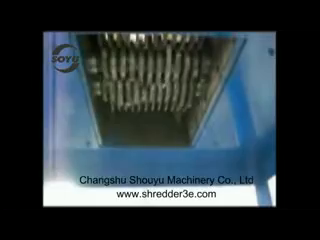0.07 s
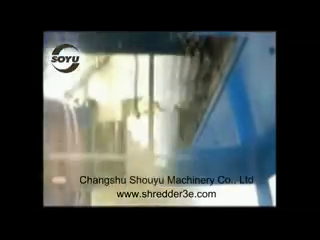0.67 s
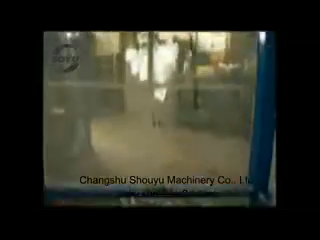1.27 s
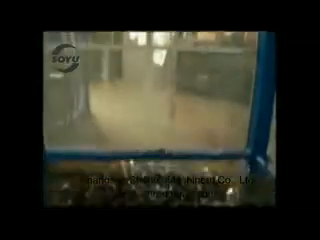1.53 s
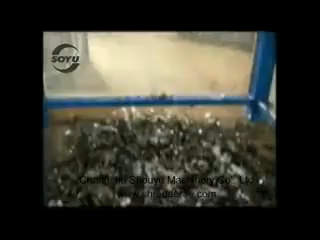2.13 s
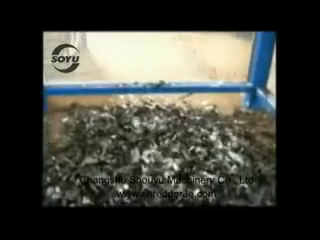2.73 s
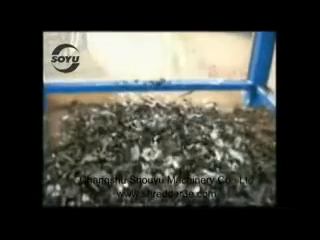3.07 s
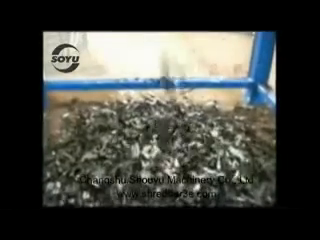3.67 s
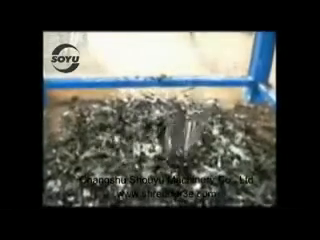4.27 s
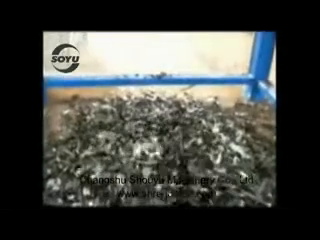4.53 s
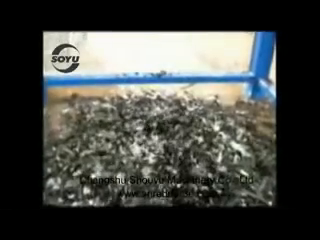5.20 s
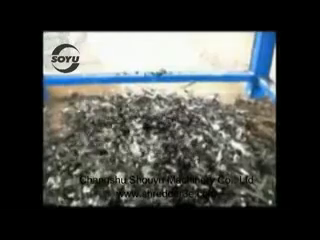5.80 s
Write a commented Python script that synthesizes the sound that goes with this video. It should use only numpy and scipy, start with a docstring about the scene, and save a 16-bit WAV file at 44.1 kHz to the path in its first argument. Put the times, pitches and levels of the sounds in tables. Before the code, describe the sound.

Steel crunches and tears in a running shredder while the fragments rattle steadily onto a heap of scrap in a bin. The noise swells in uneven flurries, dotted with cracks and brief, damped rings from larger plates. Underneath, the motor hums and the gears rumble softly, and a faint drumming from the bin joins later. It is heard from close by with a little workshop reverberation and a lo-fi, fizzy treble.

```python
"""In a workshop, a twin-shaft shredder chews sheet metal. Its motor hums over rumbling gears, and
the slips of tearing steel excite the resonances of the housing. Scrap snaps between the blades;
torn pieces clatter down the chute onto a pile and drum on the bin. Now and then a plate clangs
in damped free vibration. A small camera close by rounds off the peaks, and its low sampling rate
adds a mirror image of the spectrum in the treble."""
import sys
import numpy as np
from scipy import signal
from scipy.fft import rfft, irfft, next_fast_len
from scipy.io import wavfile
from scipy.ndimage import map_coordinates

SR = 44100
rng = np.random.default_rng(int(sys.argv[2]) if len(sys.argv) > 2 else 0)


def output_pcm(signal):
    """Save a mono or channel-first signal as 16-bit PCM at the path in sys.argv[1].

    Samples are clipped to [-1, 1] before scaling.
    """
    pcm = np.clip(np.atleast_2d(signal).T, -1, 1) * 32767
    wavfile.write(sys.argv[1], SR, np.round(pcm).astype(np.int16))


N = 265482


def amp(db):
    return 10 ** (np.asarray(db) / 20)


def unit(x):
    return x / np.sqrt(np.mean(x ** 2) + 1e-20)


def along(points, hz):
    """Interpolation of (frequency, value) points on a logarithmic frequency axis."""
    freqs, values = np.transpose(points)
    return np.interp(np.log(hz + 1), np.log(freqs + 1), values)


def curves(rows):
    """Linear interpolation in time: one value per sample for each column after the first."""
    times, *columns = np.transpose(rows)
    return [np.interp(np.arange(N) / SR, times, column) for column in columns]


def wobble(rate):
    """Smooth random modulation: a spline through rate knots a second."""
    return map_coordinates(rng.standard_normal(int(N * rate / SR) + 4), [np.arange(N) * rate / SR])


def add(track, start_s, sound):
    """Superposition of a sound on a track."""
    part = track[max(round(start_s * SR), 0):][:len(sound)]
    part += sound[:len(part)]


def filtered(x, gain):
    """Zero-phase filtering: the spectrum is multiplied by a gain over frequency."""
    size = next_fast_len(N + SR // 2)
    return irfft(rfft(x, size) * gain(np.fft.rfftfreq(size, 1 / SR)), size)[:N]


def resonances(modes, hz):
    """Summed gain of Lorentzian resonance peaks."""
    return sum(amp(db) / (1 + (2 * (hz - centre) / width) ** 2) for centre, width, db in modes)


def body(gain, size=8192):
    """Minimum-phase impulse response, of energy 1, with the spectral shape of gain."""
    magnitude = np.maximum(gain(np.fft.rfftfreq(size, 1 / SR)), 1e-6)
    cepstrum = irfft(np.log(magnitude))
    cepstrum[1:size // 2] *= 2
    cepstrum[size // 2 + 1:] = 0
    response = irfft(np.exp(rfft(cepstrum)))
    return response / np.linalg.norm(response)


def contacts(length, rate, spread_db):
    """Poisson process: about rate impulses a second, of random sign and size; rms 1."""
    hit = rng.random(length) < rate / SR
    hit[0] = True
    sign = rng.choice([-1, 1], length)
    return unit(hit * sign * amp(spread_db * np.clip(rng.standard_normal(length), -2, 2)))


def piece(pitch_hz, t60, ring, count=14):
    """Impact on a bent piece: a click and damped modes, with a formant at pitch_hz; energy 1."""
    t = np.arange(SR // 10) / SR
    mode_hz = rng.uniform(699.2, 5000, (count, 1))
    mode_t60 = t60 * np.exp(.5 * rng.standard_normal((count, 1)))
    weights = rng.standard_normal((count, 1))
    modes = np.sum(weights * np.sin(2 * np.pi * mode_hz * t) * amp(-60 * t / mode_t60), axis=0)
    formant = body(lambda hz: 0.62 + resonances([(pitch_hz, .55 * pitch_hz, 0)], hz), size=256)
    knock = np.convolve((t == 0) + ring * modes / np.linalg.norm(modes), formant)
    return knock / np.linalg.norm(knock)


def through_scrap(x):
    """Radiation from thin torn steel favours the upper middle range."""
    # spectral shape of the scrap: frequency_hz, gain_db
    radiation = [(150, -18.5), (500, -22), (1000, -7.5), (1400, -6), (1800, -6.5), (2100, -4.5),
                 (2380, -2.5), (2900, -4.5), (3500, -5.5), (4100, -5.5), (5200, 2), (7000, -38)]
    return signal.fftconvolve(x, body(lambda hz: amp(along(radiation, hz))))[:N]


def clatter(level_db, count=48):
    """Impacts on chute and pile superpose in flurries; small, high pieces strike most often."""
    flurry = amp(1.1 * wobble(70))
    knocks = np.zeros(N)
    for hz in np.linspace(1100, 4400, count):
        strikes = flurry * contacts(N, rate=hz / 110, spread_db=3.0)
        knocks += signal.oaconvolve(strikes, piece(hz, t60=0.058, ring=0.77))[:N] / np.sqrt(hz)
    return amp(level_db) * unit(through_scrap(knocks))


def through_housing(x):
    """Structure-borne sound: blows on the cutters reach the air through frame and resonant panels."""
    # spectral shape of blows on the cutters: frequency_hz, gain_db
    cutters = [(60, -23.5), (150, -9.5), (200, -4.5), (270, -1), (340, -3), (400, -1.5), (540, -3.5),
               (720, -1.5), (1000, -3), (1600, -3), (4000, -20.5)]
    # steel panel modes: centre_hz, width_hz, relative_db
    panels = [(290, 44, -15), (372, 15, -9), (624, 210, 2), (760, 56, 1), (1010, 110, -1.5)]
    response = body(lambda hz: amp(along(cutters, hz)) * (1 + 0.51 * resonances(panels, hz)))
    return signal.fftconvolve(x, response)[:N]


def crunch(level_db):
    """Shot noise: the blades tear the sheet in countless small slips."""
    return amp(level_db) * unit(through_housing(contacts(N, rate=1800, spread_db=0.5)))


def bin_boom():
    """Impact excitation: scrap landing on the pile drums on the resonant walls of the bin."""
    # wall modes: centre_hz, width_hz, relative_db
    walls = [(211.4, 48, -4), (236.8, 47, -2.5)]
    # the boom grows as the camera comes down to the bin: time_s, level_db
    boom_levels = [(0, -55), (1.5, -57), (2.0, -43.5), (3.2, -45), (4.5, -38), (6, -37.5)]
    landings = contacts(N, rate=130, spread_db=8.5)
    boom = signal.fftconvolve(landings, body(lambda hz: resonances(walls, hz)))[:N]
    return amp(curves(boom_levels)[0]) * unit(boom)


def drive(load_db):
    """Modulation: the motor's two harmonics waver, and the gears' lumpy rumble follows the load."""
    # motor hum: time_s, level_db
    hum_levels = [(0, -47), (0.6, -58), (1.0, -49), (2.6, -47), (2.97, -63), (4.2, -56.5), (4.5, -43),
                  (5.4, -60), (5.85, -43)]
    hum_db, = curves(hum_levels)
    motor_hz = 114.7
    phase = 2 * np.pi * np.cumsum(motor_hz * (1 + 0.01424 * wobble(7))) / SR
    hum = unit(amp(1.8 * wobble(6.1)) * (np.sin(phase) + 0.21 * np.sin(2 * phase)))
    # spectral shape of the gear rumble: frequency_hz, gain_db
    gears = [(10, -9.5), (25, 1), (55, 0.5), (90, 3), (150, -2.5), (300, -10.5), (1000, -51)]
    lumps = amp(4.1 * wobble(9.8))
    rumble = unit(lumps * filtered(rng.standard_normal(N), lambda hz: amp(along(gears, hz))))
    rumble_db = -45.5 + 0.49 * (load_db - load_db.mean())
    return amp(hum_db) * hum + amp(rumble_db) * rumble


def crashes():
    """Impulsive excitation: a piece cracks or crumples, rattles briefly and shakes the housing."""
    # breaking scrap: start_s, strength_db, thud_offset_db, pitch_hz, rattle_s
    breaks = [(0.093, -13, -20, 2770, .007), (0.142, -11.5, -18, 2540, 0.023),
              (0.175, -3.5, -20, 1300, 0.0097), (0.224, -14, -26, 2650, .022),
              (0.412, -10.5, -10.5, 3100, 0.0089), (0.512, -10, -40, 2820, 0.0037),
              (0.61, -11, -22, 1330, 0.0061), (0.725, -11, -34, 2600, 0.0088),
              (0.772, -15, -12, 2530, 0.048), (1.099, -17.5, -22, 3300, .022),
              (1.528, -14.5, -29, 3560, 0.024), (1.581, -8, -7.5, 1850, 0.0062),
              (1.676, -13, -22, 2520, 0.0062), (1.779, -10.5, -18, 3200, 0.0078),
              (1.863, -18.5, -10, 2790, 0.011), (2.087, -10, -9, 2500, 0.037),
              (2.256, -10, -15, 4140, 0.01), (2.456, -8, -10, 2240, 0.03), (2.547, -15.5, -2, 990, 0.013),
              (2.722, -9, -13, 2750, 0.014), (3.131, -3.5, -13, 1290, 0.011),
              (3.196, -7.5, -15, 2110, 0.0073), (3.679, -13, -32, 3740, 0.02),
              (4.025, -8.5, -28, 2350, 0.0092), (4.163, -14, -29, 1980, 0.0043),
              (4.584, -11, -13, 1250, .007), (4.763, -10.5, -8, 1980, 0.035),
              (4.898, -9.5, -6.5, 2490, 0.024), (4.952, -8.5, -16, 2560, 0.015),
              (4.983, -11.5, -5.5, 2230, 0.017), (5.039, -9, -7.5, 2250, 0.007),
              (5.095, -10.5, -25, 2060, 0.0077), (5.14, -5.5, -30, 2330, 0.0062),
              (5.264, -4, -27, 2600, .014), (5.321, -9, -11, 2520, 0.0096), (5.425, -5, -12, 1600, 0.011),
              (5.46, -6.5, -10, 3100, 0.021), (5.521, -7.5, -34, 2560, .01), (5.595, -9, -12, 2250, 0.0071),
              (5.648, -8, -17, 2600, 0.017)]
    snap = 1.57  # lifts the first contacts above the rattle
    t = np.arange(SR // 5) / SR
    cracks, thuds = np.zeros(N), np.zeros(N)
    for start_s, db, thud_offset_db, pitch_hz, rattle_s in breaks:
        onset = 1 + (snap - 1) * np.exp(-t / 0.0028)
        envelope = onset * amp(-60 * np.maximum(t - rattle_s, 0) / 0.13)
        burst = envelope * contacts(len(t), rate=6000, spread_db=2.0)
        burst[0] = 4.2 * snap
        crack = signal.fftconvolve(burst, piece(pitch_hz, t60=.025, ring=0.23))
        thud = envelope * contacts(len(t), rate=1900, spread_db=-2.0)
        add(cracks, start_s, amp(db - 11.0) * crack)
        add(thuds, start_s, amp(db + thud_offset_db - 7.0) * thud)
    return through_scrap(cracks) + through_housing(thuds)


def shredding_levels():
    """Incoherent sources add in power: steady flow plus bites give clatter and crunch levels in dB."""
    # steady flow of scrap: time_s, clatter_db, crunch_db
    flow = [(0, -28.5, -31.5), (0.39, -31, -37.5), (0.48, -26.5, -29.5), (0.93, -25, -34.5),
            (1.1, -28, -35), (1.5, -29.5, -35), (1.9, -29.5, -33.5), (2.38, -33, -32.5), (2.55, -25.5, -31),
            (3.12, -24.5, -32), (3.28, -19.5, -30), (3.67, -27.5, -31), (4.05, -23, -32),
            (4.3, -27.5, -35.5), (4.72, -30.5, -28.5), (5.0, -22, -29), (5.58, -19, -26),
            (6.02, -26.5, -29.5)]
    # the cutters bite and chips spill down: start_s, length_s, clatter_db, crunch_db
    bites = [(0.205, 0.11, -19, -31), (0.4, 0.024, -15.5, -35.5), (0.756, 0.14, -25.5, -27.5),
             (0.989, 0.014, -24, -30), (1.147, 0.025, -20.5, -27), (1.254, 0.031, -20, -34),
             (1.693, 0.072, -21.5, -40.5), (2.41, 0.023, -21.5, -34), (2.474, 0.15, -23, -22.5),
             (2.663, 0.086, -18, -21), (3.02, 0.06, -21, -26), (3.173, 0.026, -14.5, -25),
             (3.328, 0.046, -20.5, -27), (3.401, 0.026, -14, -21.5), (3.565, 0.048, -19, -27.5),
             (3.714, 0.15, -18.5, -32), (3.897, 0.022, -12, -21), (4.233, 0.031, -19.5, -29.5),
             (4.37, 0.046, -22, -32), (4.537, 0.045, -33, -25), (5.161, 0.063, -16.5, -31.5),
             (5.352, 0.17, -18, -30), (5.662, 0.15, -17, -24), (5.882, 0.065, -23, -23.5)]
    attack_s, release_t60_s = 0.018, 0.18
    t = np.arange(N) / SR
    power = amp(curves(flow)) ** 2
    for start_s, length_s, clatter_db, crunch_db in bites:
        rise = np.clip((t - start_s) / attack_s, 0, 1)
        fall = amp(-60 * np.maximum(t - start_s - length_s, 0) / release_t60_s)
        power += (amp([[clatter_db], [crunch_db]]) * rise * fall) ** 2
    return 10 * np.log10(power)


def clangs():
    """Damped free vibration of larger plates; rubbing on their neighbours unsettles the pitch."""
    # ringing plates: start_s, pitch_hz, level_db
    plates = [(0.80, 1028, -18), (0.915, 640, -22), (1.28, 622, -20), (1.545, 2016, -17),
              (1.895, 1880, -19), (2.46, 2364, -7), (2.555, 450, -19), (2.615, 391, -20),
              (3.43, 674, -12.5), (4.164, 2150, -15.5), (4.565, 576, -26), (4.775, 399, -19.5),
              (5.142, 766, -7.5), (5.294, 2340, -10), (5.518, 2360, -13)]
    t = np.arange(SR // 3) / SR
    track = np.zeros(N)
    for start_s, pitch_hz, level_db in plates:
        t60 = 0.1 * (1000 / pitch_hz) ** 0.49  # higher plates die away sooner
        envelope = amp(level_db - 60 * t / t60) * (1 - np.exp(-t / 0.0013))
        phase_drift = 13 * np.cumsum(rng.standard_normal(len(t))) / np.sqrt(SR)
        add(track, start_s, envelope * np.sin(2 * np.pi * pitch_hz * t + phase_drift))
    return track


def workshop(x):
    """Diffuse reverberation: the tail is drawn afresh every 0.2 s, so the hall has no fixed tones."""
    # reverberation time of the hall: frequency_hz, t60_s
    decay_times = [(200, 1), (1500, 0.3), (5000, 0.39)]
    wet, step, delay_s = np.zeros(N), SR // 5, .0045
    for start in range(0, N, step):
        hz, t, noise = signal.stft(rng.standard_normal(SR // 2), SR, nperseg=256)
        decay = amp(-60 * t / along(decay_times, hz)[:, None])
        tail = signal.istft(noise * decay, SR, nperseg=256)[1]
        reflections = signal.fftconvolve(x[start:start + step], tail / np.linalg.norm(tail))
        add(wet, start / SR + delay_s, reflections)
    return wet


def scene():
    """Superposition of the metal's direct and reverberant sound, the bin and the drive."""
    clatter_db, crunch_db = shredding_levels()
    metal = clatter(clatter_db) + crunch(crunch_db) + crashes() + clangs()
    return (metal + amp(-12.5) * workshop(metal) + bin_boom() + drive(crunch_db))[None]


def record(dry):
    """Saturation and imaging: the camera rounds peaks and mirrors the spectrum about half its rate."""
    # anti-aliasing filter: frequency_hz, gain_db
    input_filter = [(3600, -2), (4100, -4), (4500, -12.5), (4900, -22.5), (5150, -36), (5400, -61),
                    (5600, -120)]
    # treble response after sampling: frequency_hz, gain_db
    output_filter = [(4300, 1.5), (5000, 3), (6200, -0.5), (6900, -3.5), (7600, -8.5)]
    ceiling, sampling_hz, top_hz = .72, 11025, 7720
    rounded = dry[0] / (1 + np.abs(dry[0] / ceiling) ** 4) ** (1 / 4)
    baseband = filtered(rounded, lambda hz: amp(along(input_filter, hz)))
    mirror = baseband * 2 * np.cos(2 * np.pi * sampling_hz * np.arange(N) / SR)
    edge_db = lambda hz: -70 * np.clip((hz - top_hz + 200) / 400, 0, 2) ** 2
    return filtered(baseband + mirror, lambda hz: amp(along(output_filter, hz) + edge_db(hz)))[None]


dry = scene()
out = record(dry)
output_pcm(out)
```